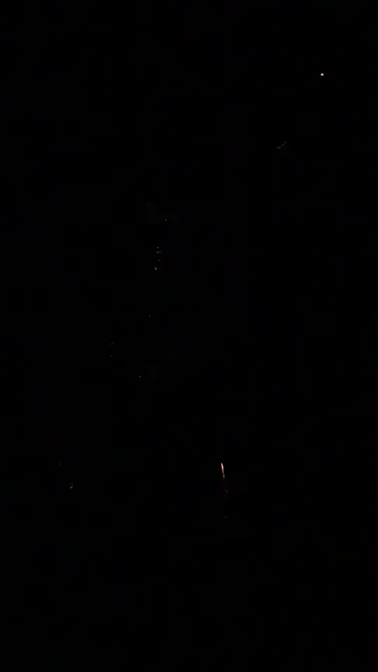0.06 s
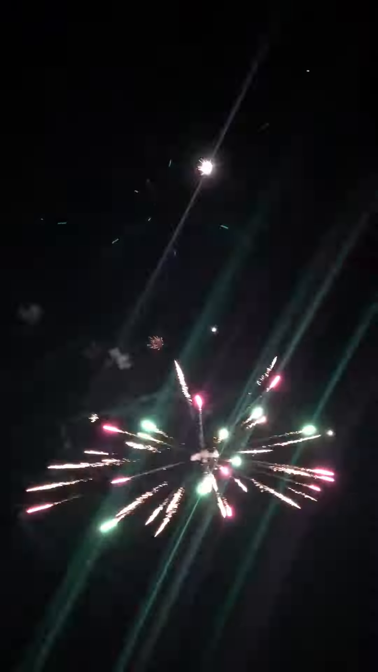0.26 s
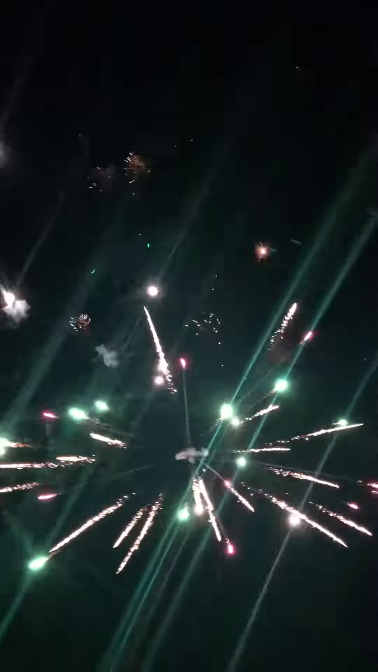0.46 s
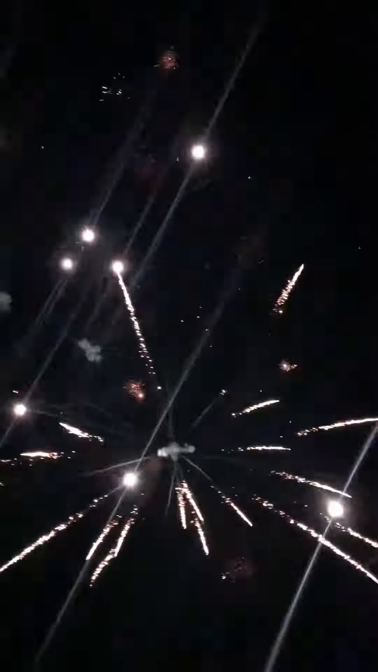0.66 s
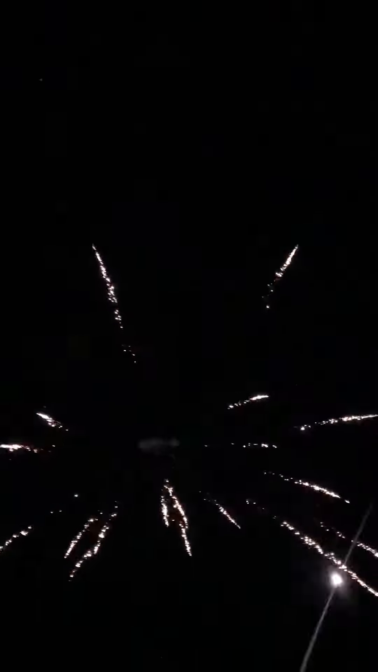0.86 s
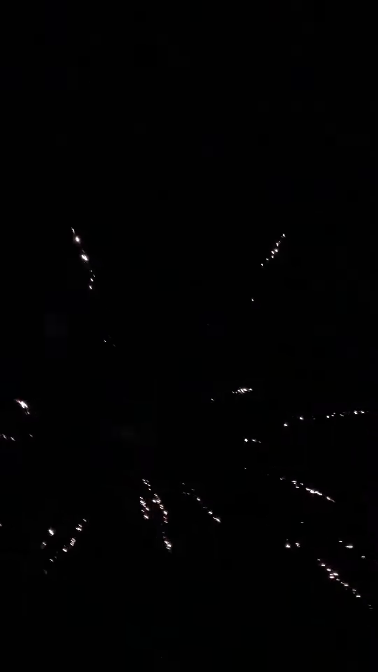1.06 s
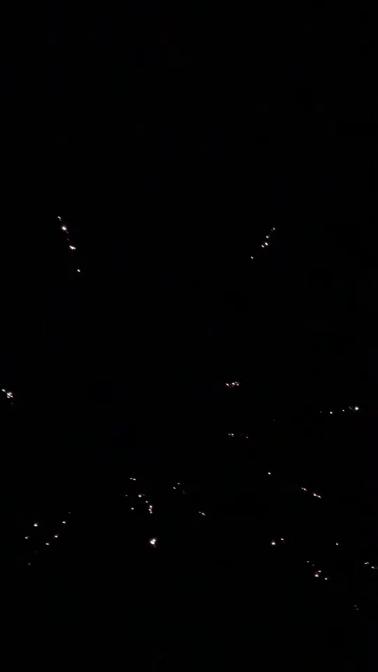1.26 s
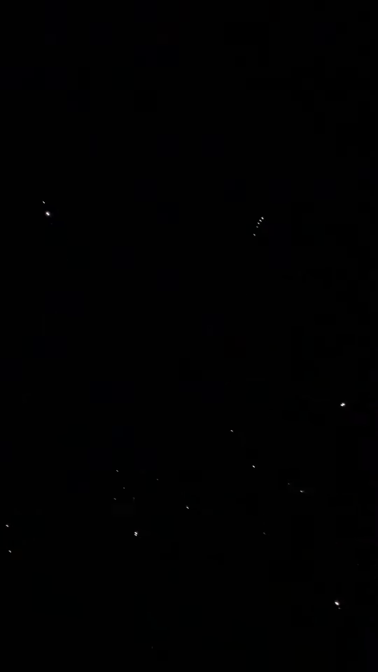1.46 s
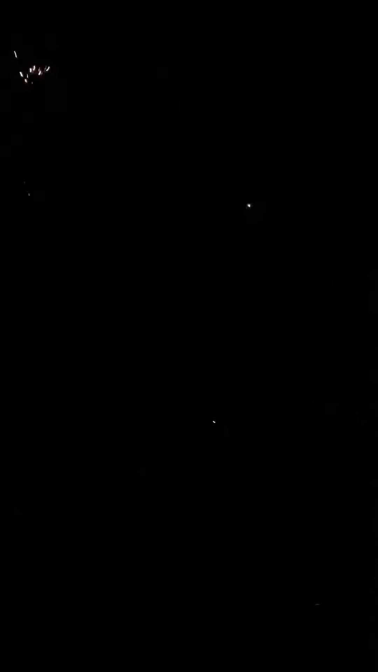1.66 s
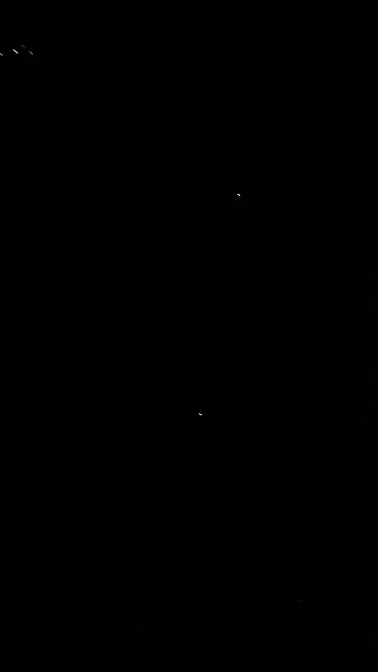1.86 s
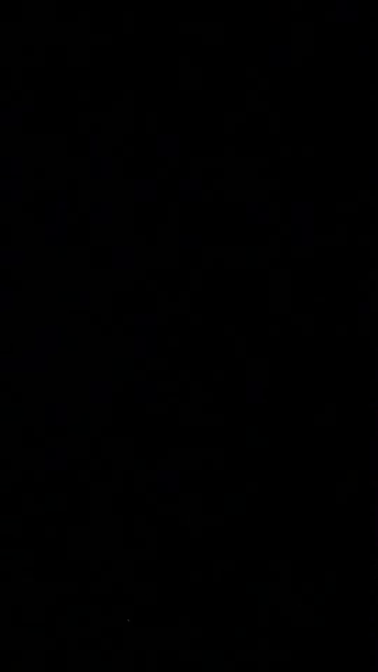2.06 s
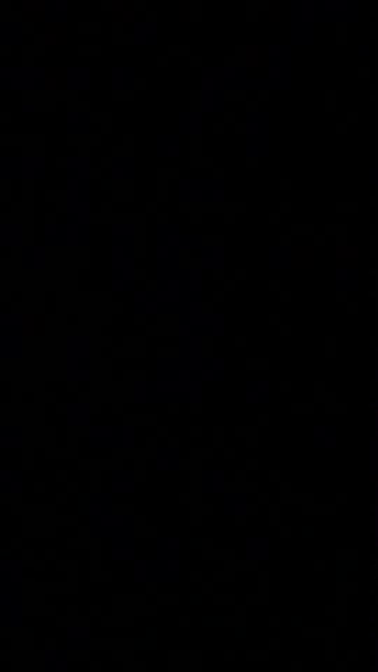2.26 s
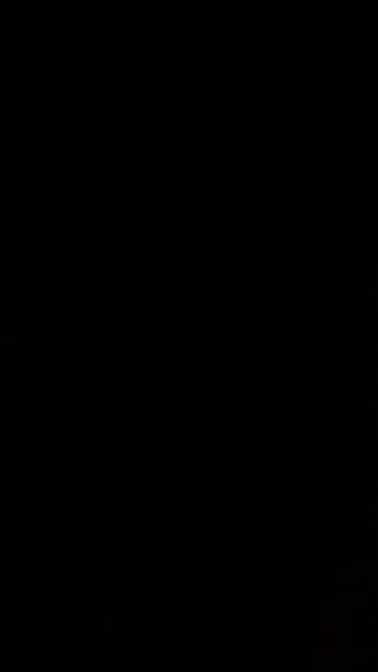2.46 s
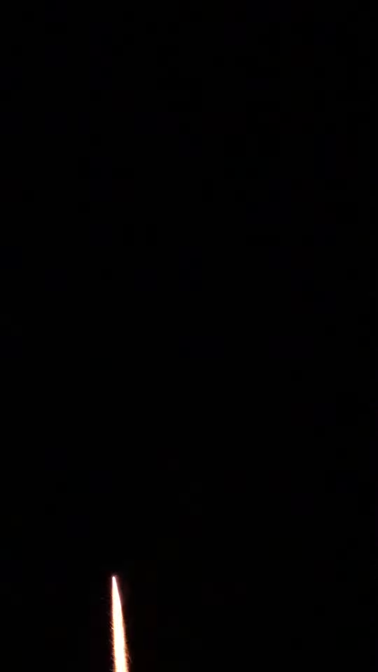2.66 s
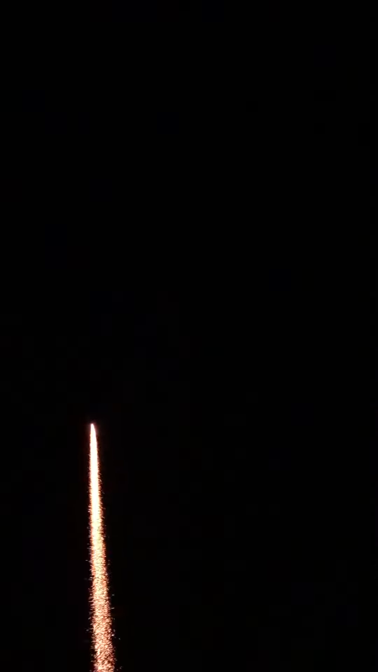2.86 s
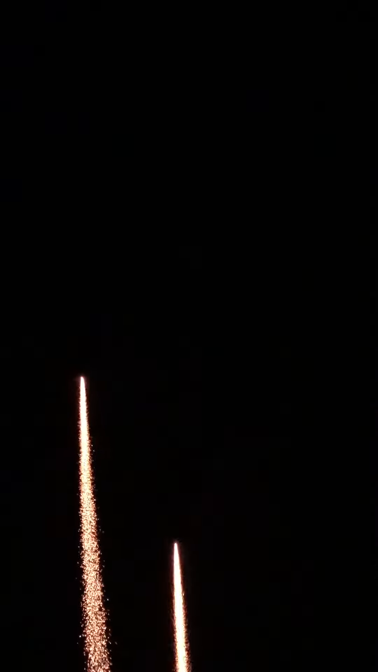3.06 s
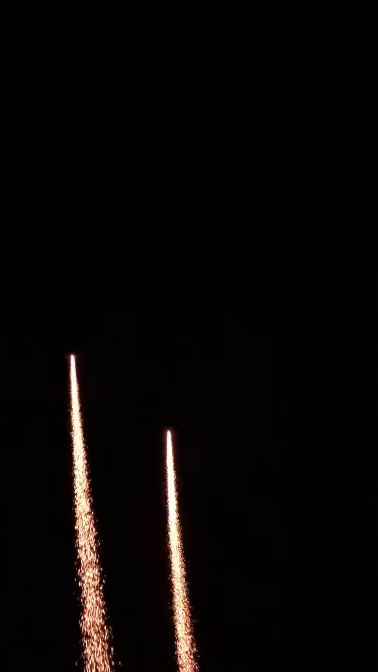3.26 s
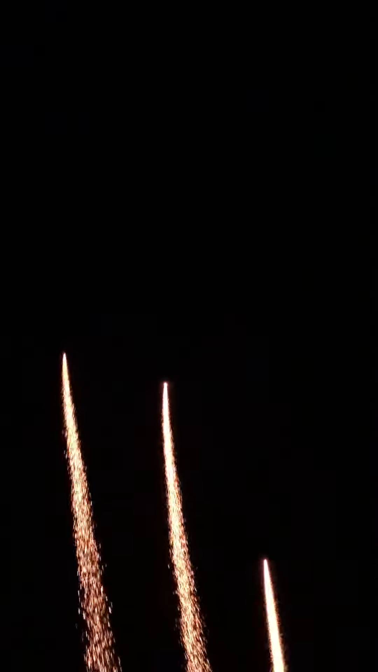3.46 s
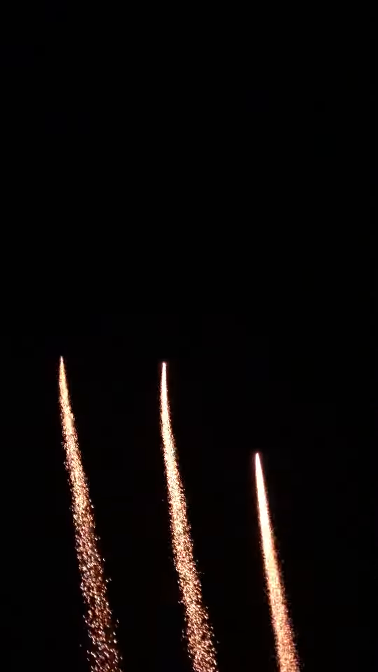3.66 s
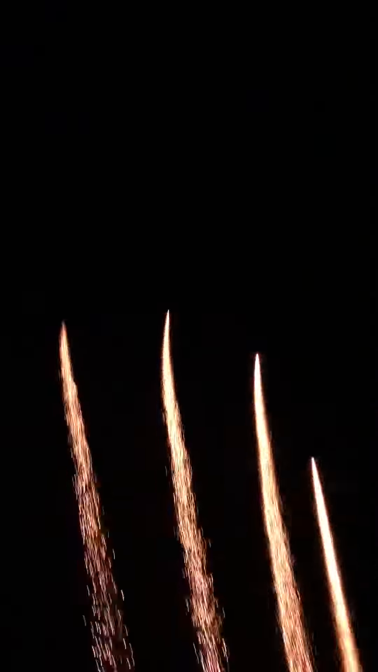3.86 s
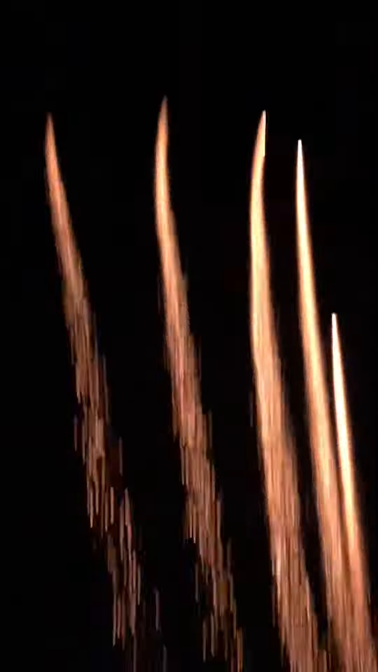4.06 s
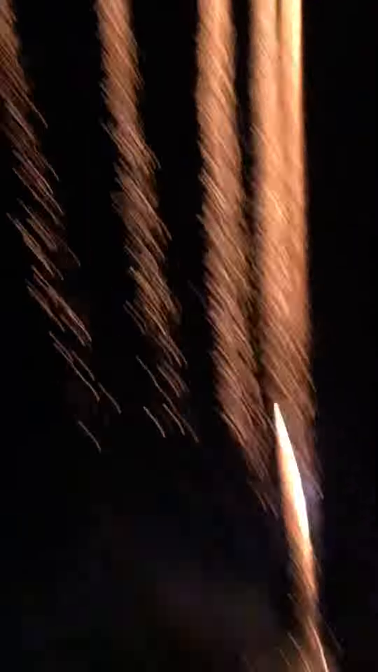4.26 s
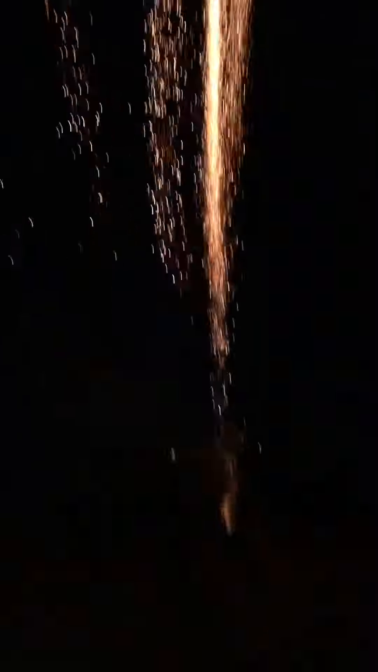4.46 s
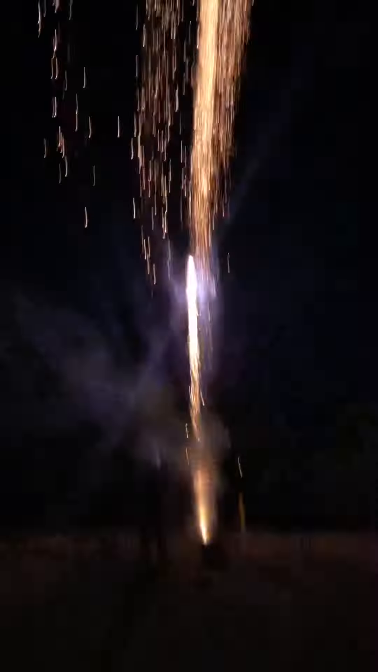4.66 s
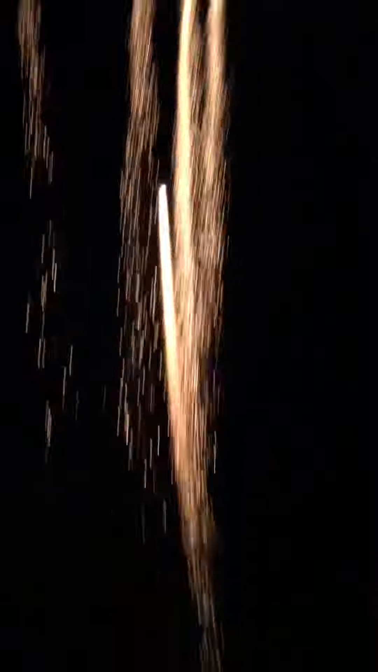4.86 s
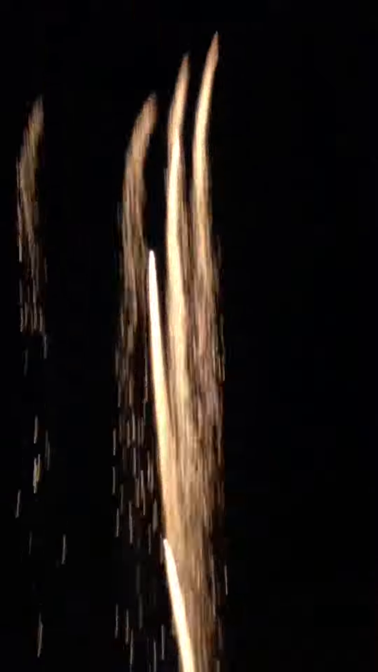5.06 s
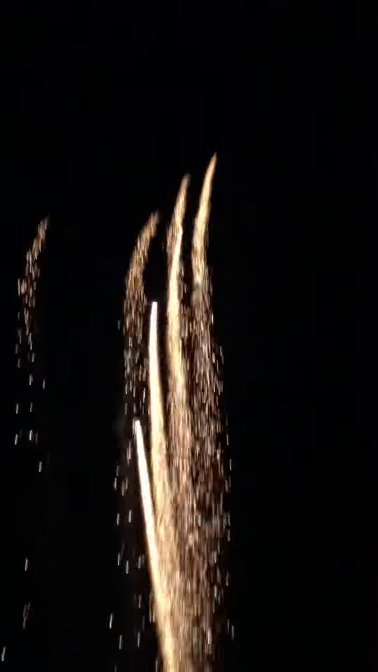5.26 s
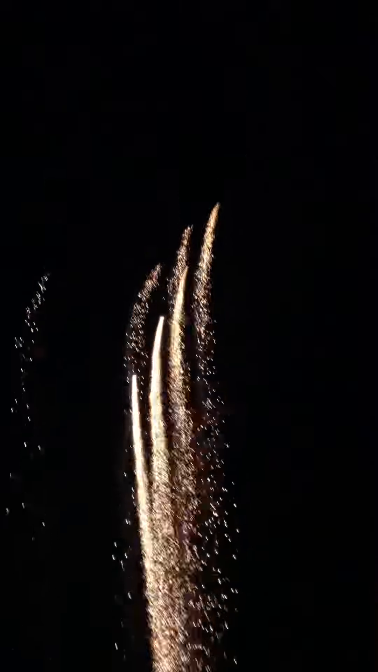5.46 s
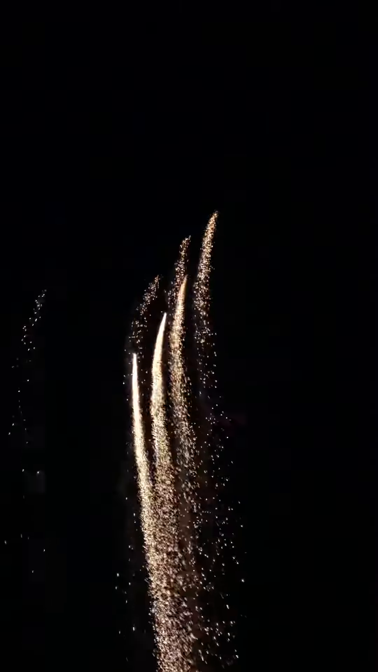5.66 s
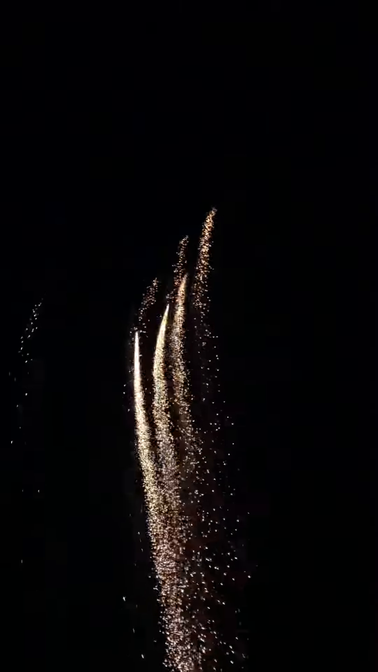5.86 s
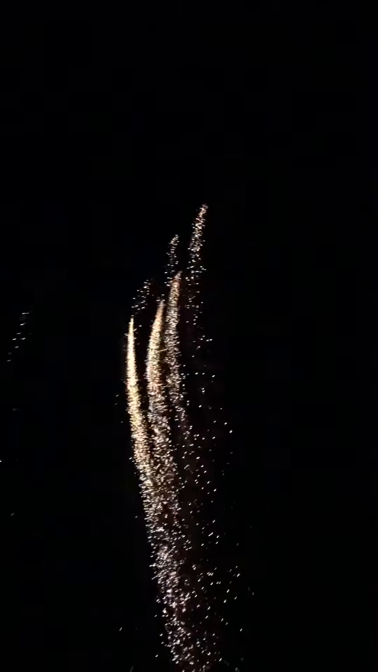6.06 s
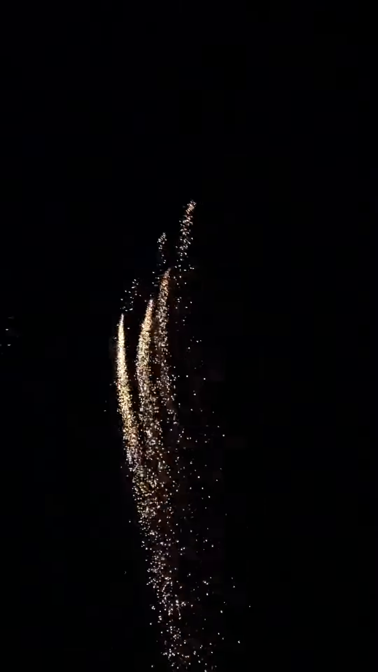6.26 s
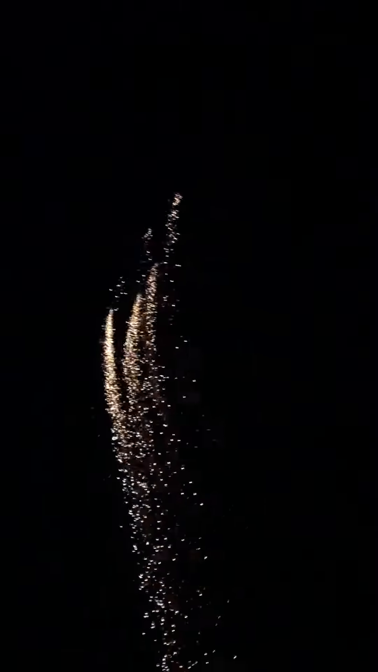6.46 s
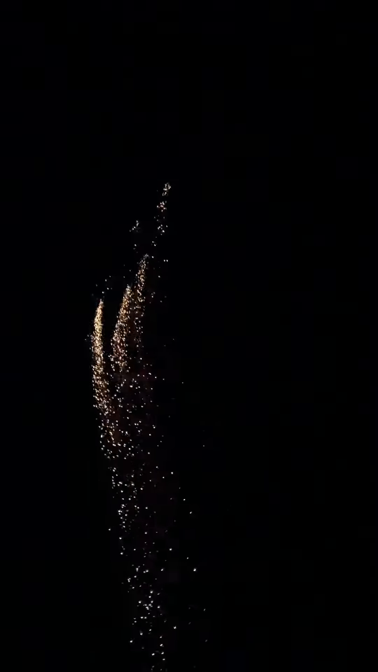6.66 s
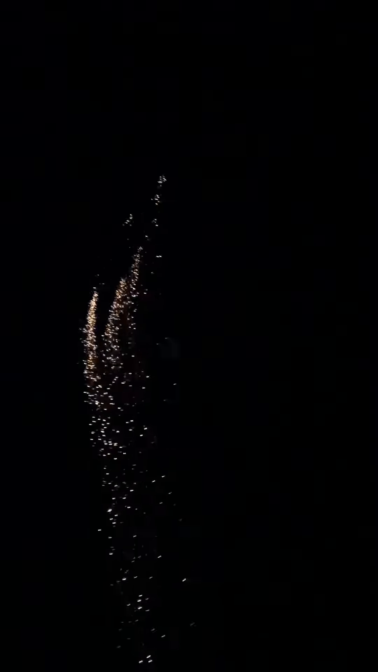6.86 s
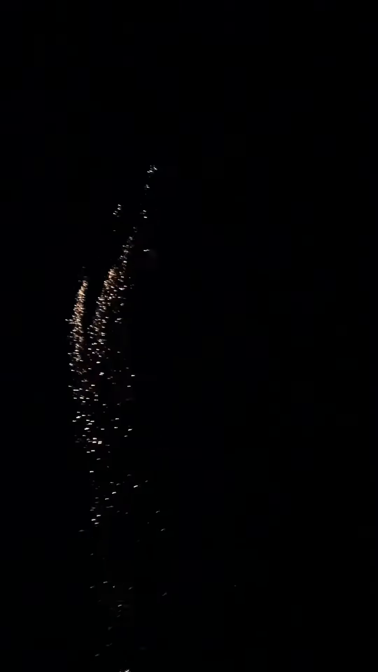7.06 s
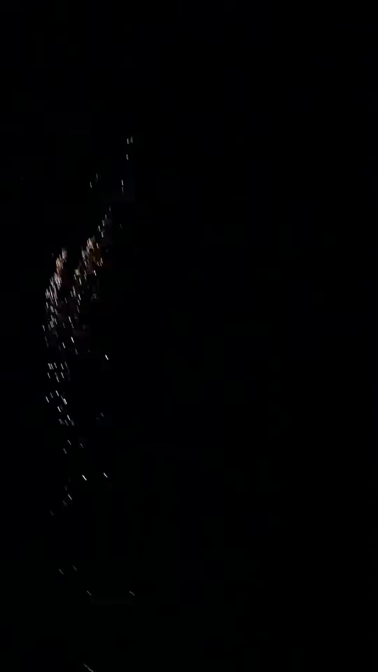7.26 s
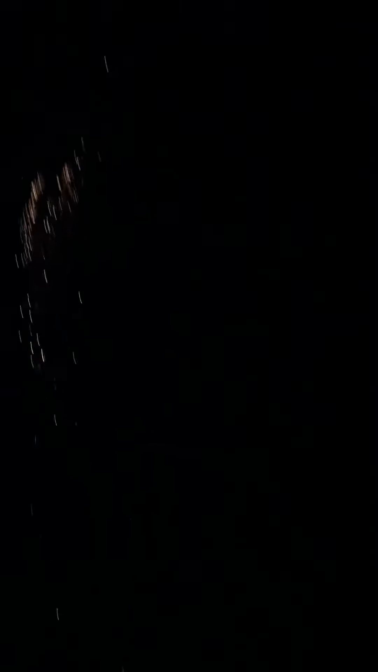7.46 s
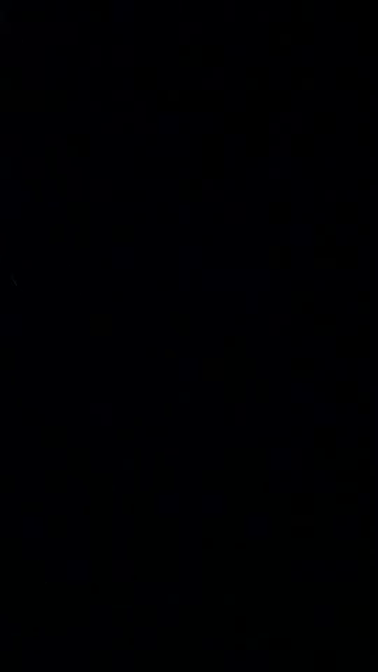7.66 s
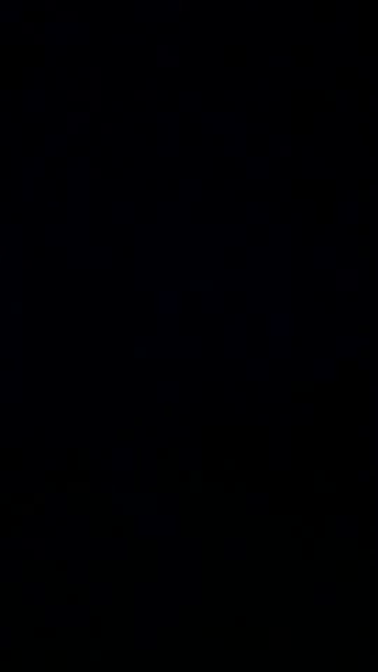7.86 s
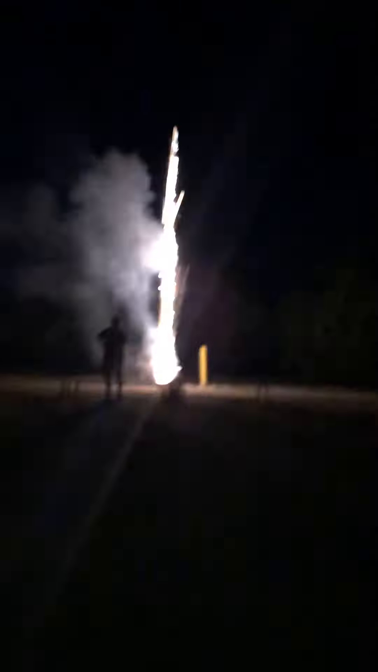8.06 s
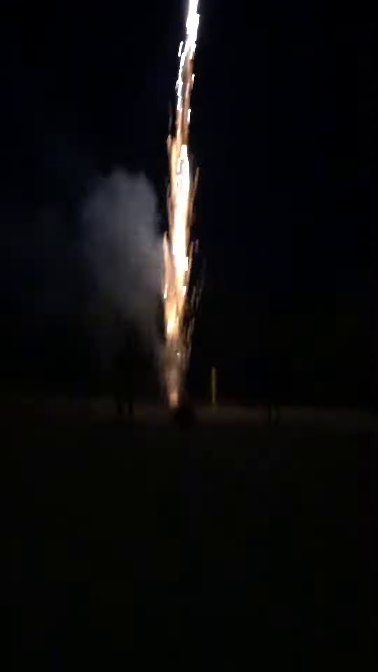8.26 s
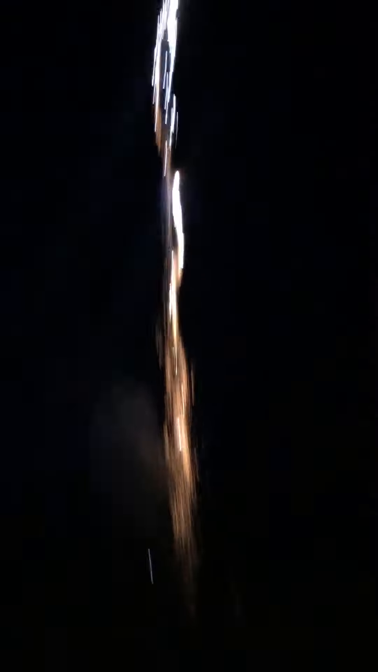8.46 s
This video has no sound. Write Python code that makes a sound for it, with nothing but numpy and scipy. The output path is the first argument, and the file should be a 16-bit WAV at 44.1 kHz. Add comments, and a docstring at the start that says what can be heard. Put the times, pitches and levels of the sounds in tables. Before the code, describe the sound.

Outdoors at night, the echo of an earlier firework is fading when a shell bursts overhead with a loud bang at about 0.2 seconds. Its stars crackle densely from 0.35 to 1 second, with stray pops at 1.2 and 1.7 as the echo rolls away. From 2.4 to 5 seconds a fireworks cake fires eight shots, roughly a third of a second apart. Each is a sharp, hollow thump with a brief spit of gas, echoing off walls and far trees. A lull follows, holding only a few tiny ticks and the very faint background: a low murmur of distant traffic, a thin machine hum and a cricket. At about 8 seconds three shots fire almost together, and a shrill, warbling whistle sputters, swells and begins to recede as it climbs, lasting to the end at around 8.5 seconds.

```python
"""A shell bursts overhead, over the fading roll of an earlier one, and its stars crackle: a fireworks cake
on open ground at night. Eight comets thump from their tubes one by one, then three shots leave almost
together and a warbling whistle climbs away. Each blast is a pressure pulse, reflected by the ground and
walls and scattered by far trees. Between shots a low murmur, a distant hum and a cricket remain."""
import sys
import numpy as np
from scipy import signal
from scipy.fft import rfft, irfft, next_fast_len
from scipy.io import wavfile
from scipy.ndimage import uniform_filter1d, minimum_filter1d, map_coordinates

SR = 44100
rng = np.random.default_rng(int(sys.argv[2]) if len(sys.argv) > 2 else 0)


def store_pcm(level_fs):
    """Save levels as 16-bit WAV."""
    pcm = np.round(np.clip(level_fs, -1, 1) * 32767).astype(np.int16)
    wavfile.write(sys.argv[1], SR, np.atleast_2d(pcm).T)


N = 374850
T = np.arange(N) / SR
PAD = SR  # event tracks start one second early

def amp(db):
    return 10 ** (np.asarray(db) / 20)

def unit_rms(x):
    return x / np.sqrt(np.mean(x ** 2) + 1e-20)

def along(table, hz, column=1):
    """Interpolation of a table column on a log-frequency axis."""
    rows = np.array(table)
    return np.interp(np.log(hz + 1), np.log(rows[:, 0] + 1), rows[:, column])

def filtered(x, response):
    """Linear filtering: the spectrum of x times a frequency response."""
    size = next_fast_len(len(x) + 8192)
    return irfft(rfft(x, size) * response(np.fft.rfftfreq(size, 1 / SR)), size)[:len(x)]

def band(hz, width):
    """Second-order resonance, its bandwidth a share of its pitch."""
    return lambda f: 1j * f * hz * width / (hz * hz - f * f + 1j * f * hz * width)

def wobble(rate_hz):
    """Random modulation: a smooth curve through rate_hz knots a second."""
    return map_coordinates(rng.standard_normal(int(N * rate_hz / SR) + 4), [T * rate_hz])

def add(track, start_s, sound):
    """Superposition of a sound on an event track."""
    part = track[PAD + round(start_s * SR):][:len(sound)]
    part += sound[:len(part)]

def shaped_noise(spectrum):
    """Spectral shaping of white noise, RMS 1."""
    return unit_rms(filtered(rng.standard_normal(N), lambda f: amp(along(spectrum, f))))

def impulse(spectrum):
    """Minimum phase: the most abrupt pulse with this spectrum, peak 1."""
    cepstrum = irfft(np.log(amp(along(spectrum, np.fft.rfftfreq(2048, 1 / SR)))))
    cepstrum[1:1024] *= 2
    cepstrum[1025:] = 0
    pulse = irfft(np.exp(rfft(cepstrum)))[:1024]
    return pulse / np.abs(pulse).max()

def blast(positive_s):
    """Blast wave: a pressure jump followed by suction."""
    u = np.arange(1500) / SR / positive_s
    return (1 - u) * np.exp(-u)

def puff(hz, fall_30db_s):
    """Exponential decay of band-limited noise, peak 1."""
    t = np.arange(SR // 5) / SR
    noise = rng.standard_normal(len(t)) * amp(-30 * t / fall_30db_s)
    sound = filtered(noise, lambda f: band(hz, 1.2)(f) ** 2)
    return sound / np.abs(sound).max()

# Spectrum of far traffic: frequency_hz, relative_db
TRAFFIC_SPECTRUM = [(12, -45.5), (20, -13.5), (75, -2), (108, -8), (139, -3.5), (174, -11), (452, -17),
                    (1280, -31.5), (1740, -27), (2120, -34.5), (15200, -47.5), (16500, -52)]
def traffic():
    """Incoherent sources: far traffic merges into low, gently wavering noise."""
    return shaped_noise(TRAFFIC_SPECTRUM) * amp(-59 + .99 * wobble(3.6))

# Tones of a distant machine: pitch_hz, level_db
HUM_TONES = [(1707, -73), (1830, -76.5)]
def machine_hum():
    """Narrowband tones, drifting in level and phase."""
    return sum(amp(db + 1.3 * wobble(3.8)) * np.sin(2 * np.pi * hz * T + .4 * wobble(21))
               for hz, db in HUM_TONES)

def cricket():
    """Amplitude modulation: a high tone pulses in irregular chirps."""
    chirps = np.clip(wobble(7.8), 0, 1)
    pulses = np.clip(np.sin(2 * np.pi * 28 * T + 2 * wobble(16)), -.3, 1)
    return amp(-80) * chirps * pulses * np.sin(2 * np.pi * 4700 * T + 1.5 * wobble(60))

# Small ticks, dull knocks and a low wind bump: start_s, level_db, pitch_hz, fall_30db_s
SMALL_SOUNDS = [(.164, -37, 6100, 0.0025), (.175, -27, 670, .016), (1.588, -32, 497, 0.0084),
                (1.596, -50, 4900, .003), (2.218, -37.5, 850, 0.008), (2.336, -37, 502, .03),
                (3.2072, -17, 1210, 0.0036), (5.46, -52, 4480, .011), (6.029, -55, 5870, 0.0032),
                (6.07, -50.5, 1390, .014), (6.627, -54, 4470, .004), (6.872, -57.5, 3470, .034),
                (7.236, -49, 5930, .0046), (7.243, -50.5, 3440, 0.092), (7.655, -54, 3480, .02),
                (7.67, -48, 488, .049), (7.79, -47.5, 64.5, 0.1)]
def small_sounds():
    """Damped noise transients: ticks, knocks and a wind bump, plus faint ticks at chance times."""
    out = np.zeros(N + PAD)
    faint = [(when * N / SR, -58 - 6 * size, 4500 * (.5 + pitch), .005)
             for when, size, pitch in rng.random((24, 3))]
    for start_s, db, hz, fall_s in [*SMALL_SOUNDS, *faint]:
        add(out, start_s, amp(db) * puff(hz, fall_s))
    return out

# Decay of the scattered sound: frequency_hz, near_t60_s, far_t60_s, far_level_db
TAIL_DECAY = [(60, 0.14, 3.9, -15), (252, 0.4, 3.45, -19.5), (930, 0.45, 3.81, -15.5),
              (2900, 0.66, 2.13, -13.5), (7540, 0.54, 0.83, -20), (14800, 0.15, 0.44, -23)]
def reverberation(spectrum, onset_s, rise_s, treble_db=0):
    """Diffuse scattering: near things answer first, far trees longest, in uneven lumps."""
    hz, t, noise = signal.stft(rng.standard_normal(3 * SR), SR, nperseg=256)
    near_t60, far_t60, far_db = [along(TAIL_DECAY, hz, column)[:, None] for column in (1, 2, 3)]
    decay = np.hypot(amp(-60 * t / near_t60), amp(far_db - 60 * t / far_t60))
    lumps = uniform_filter1d(rng.standard_normal(noise.shape), size=7, axis=0)
    lumps = uniform_filter1d(lumps, size=9, axis=1)
    tail = signal.istft(noise * decay * amp(2.3 * unit_rms(lumps)), SR, nperseg=256)[1]
    tail = filtered(tail, lambda f: amp(along(spectrum, f)))
    tail /= np.sqrt(np.mean(tail[:SR // 10] ** 2))
    tail = filtered(tail, lambda f: amp(treble_db * f ** 2 / (f ** 2 + 3500 ** 2)))
    t = np.arange(len(tail)) / SR
    early = .37 * np.clip(t / .01, 0, 1)
    late = 1 - np.exp(-np.clip(t - onset_s, 0, None) / rise_s)
    return tail * (early + late)

# Single reflections from walls: delay_s, relative_db, pitch_hz, smear_s
WALL_ECHOES = [(0.0194, -17, 2165, 0.0095), (.048, -19, 3550, 0.013), (.078, -21.5, 900, .004)]
def add_wall_echoes(track, start_s, thump, colour, echo_db):
    """Rough reflection: each uneven wall smears the crack of a launch and returns its thump."""
    t = np.arange(900) / SR
    for delay_s, db, hz, smear_s in WALL_ECHOES:
        rough = rng.standard_normal(len(t)) * np.exp(-2 * (2 * t / smear_s - 1) ** 2)
        smeared = np.convolve(blast(.00028), rough / np.linalg.norm(rough))
        crack = filtered(smeared, lambda f: band(hz, 2.5)(f) * colour(f))
        add(track, start_s + delay_s, amp(db + echo_db + 45) * crack)
        add(track, start_s + delay_s + smear_s / 2, amp(db + 2) * filtered(thump, band(480, 1.3)))

# Turning points of the whistle's fundamental: time_s, pitch_hz
WHISTLE_PITCH = [(8.1, 2502), (8.109, 2664), (8.125, 2342), (8.15, 2277), (8.191, 2632), (8.224, 2319),
                 (8.255, 2655), (8.275, 2432), (8.291, 2511), (8.31, 2355), (8.347, 2624), (8.372, 2425),
                 (8.402, 2470), (8.413, 2404), (8.441, 2497), (8.5, 2413)]
# Partials of the whistle: pitch_ratio, relative_db
WHISTLE_PARTIALS = [(1, -21.5), (1.5, -25), (2, 1.5), (3, -14.5), (4, -24.5), (5, -27), (6, -27.5)]
# Spectrum of its gas jet: frequency_hz, relative_db
JET_SPECTRUM = [(59, -70), (100, -75), (2210, -29.5), (2460, -24), (4290, -16.5), (4880, -0.5),
                (5670, -11.5), (14800, -37), (16500, -87)]
def whistle():
    """Pulsed combustion in a tube: it sputters, nearly dies, swells to full and recedes."""
    full_s, swell_s, catch_s, open_s, fade_db_per_s = 8.139, .013, .0043, .082, 12.5
    turn_s, turn_hz = np.transpose(WHISTLE_PITCH)
    age = T - turn_s[0]
    hz = uniform_filter1d(np.interp(T, turn_s, turn_hz), size=500) * (1 + .0063 * wobble(250))
    phase = 2 * np.pi * np.cumsum(hz) / SR
    burn_db = np.interp(T, [turn_s[0], full_s - swell_s, full_s], [-15, -33, -9])
    burn_db -= fade_db_per_s * np.clip(T - full_s, 0, None)
    burn = amp(burn_db) * np.clip(age / catch_s + 1, 0, 1) ** 2
    flame = np.clip(age / open_s, 0, 1)  # as it opens, the other partials join the second harmonic
    tone = np.zeros(N)
    for ratio, db in WHISTLE_PARTIALS:
        level = amp(db + 3.3 * wobble(90)) * flame ** abs(ratio - 2) ** .5
        jitter = (3.2 * (ratio % 1) + .12 * ratio) * wobble(300)
        tone += level * np.sin(ratio * phase + jitter)
    jet = shaped_noise(JET_SPECTRUM) * amp(-15.5 + 2.9 * wobble(84))
    return burn * (tone + jet)

def climbing(direct):
    """Doppler shift: the whistle's ground echo lags ever more, so it sounds flat and beats; walls echo."""
    age = np.clip(T - WHISTLE_PITCH[0][0], 0, None)
    lag_s = .003 + .011 * (1 - np.exp(-age / .25))
    ground = map_coordinates(direct, [(T - lag_s) * SR])
    out = direct + filtered(ground, lambda f: 1.11 / (1 + (f / 8000) ** 2))
    for delay_s, db, *_ in WALL_ECHOES:
        out += amp(db - 1.5) * np.pad(direct, (round(delay_s * SR), 0))[:N]
    return out

# Spectrum of one crack: frequency_hz, relative_db
CRACK_SPECTRUM = [(20, -37.5), (150, -9), (500, 1), (1500, 3.5), (4000, 1), (8000, -5.5), (16000, -21.5)]
# Spectrum of the echoes of blasts overhead: frequency_hz, relative_db
SKY_ECHO_SPECTRUM = [(24, -68), (40, -44.5), (191, -5), (1090, -5.5), (1200, -8.5), (3370, -13.5),
                     (5050, -14.5), (7950, -21.5), (15300, -30.5), (16500, -45.5)]
# Loud crackling stars: start_s, level_db
LOUD_STARS = [(.3392, -17), (.3650, -7.5), (.3763, -9), (.3916, -6), (.4006, -11), (.4102, -6), (.4448, -4),
              (.4641, -5.5), (.4750, -10), (.4836, -4.5), (.4902, -9.5), (.5044, -8), (.5112, -7.5),
              (.5152, -4.5), (.5270, -3.5), (.5437, -11), (.5600, 0.5), (.5702, -3.5), (.5765, -5.5),
              (.5895, -13), (.5980, -2), (.6010, -6), (.6230, 1.5), (.6405, -0.5), (.6425, -7.5),
              (.6515, -6), (.6585, -1), (.6615, -3), (.6700, -6), (.6752, -6), (.6797, 3), (.6975, -2.5),
              (.7072, -2), (.7136, -3), (.7322, 1.5), (.7512, -2.5), (.7590, -1), (.7818, -3), (.7938, 0.5),
              (.8080, -9.5), (.8150, -5), (.8278, 0.5), (.8380, -5), (.8584, 3), (.8820, -5.5), (.8974, -7),
              (.9012, -5.5), (.9540, 1), (1.2018, 1), (1.6704, 0)]
def stars():
    """Impulse train: stars crack, twice in the dense swarm, and reflect off rough ground."""
    swarm_s, spread_s, mean_gap_s = .67, .085, .0016
    weak_stars = [(swarm_s + 2 * spread_s * (a + b + c - 1.5), -10 - 22.5 * size)
                  for a, b, c, size in rng.random((85, 4))]
    cracks, second_cracks, tints = np.zeros((3, N + PAD))
    for start_s, db in [*LOUD_STARS, *weak_stars]:
        tint, gap, drop = rng.random(3)
        add(cracks, start_s, amp([db]))
        add(tints, start_s, amp([db]) * .84 * (tint - .5))
        if start_s < swarm_s + 3 * spread_s:
            add(second_cracks, start_s + mean_gap_s * (.5 + gap), amp([db - 2 - 16.5 * drop]))
    cracks += filtered(tints, band(1500, 1.8))  # each star has its own colour
    ground = rng.standard_normal(90) * amp(-.12 * np.arange(90))
    paths = np.pad(amp(-17) * ground / np.linalg.norm(ground), (round(.0112 * SR), 0))
    paths[0] = 1  # the direct path
    pops = signal.fftconvolve(cracks + second_cracks, np.convolve(paths, impulse(CRACK_SPECTRUM)))
    roll = signal.fftconvolve(cracks, reverberation(SKY_ECHO_SPECTRUM, onset_s=.052, rise_s=.16))
    return pops[:N + PAD] + amp(-38) * roll[:N + PAD]

# Shell bursts in the sky: start_s, crack_db, boom_db, rumble_db, walls_db, roll_db
SHELL_BURSTS = [(-.45, -10, 4, -8, -18, -22), (0.1888, -1, 15.5, -6.5, -23, -26.5)]
def shells():
    """Multipath propagation: a blast arrives direct, off the ground, off near walls, then as a roll."""
    out, t = np.zeros(N + PAD), np.arange(SR // 20) / SR
    crack = np.pad(impulse(CRACK_SPECTRUM), (0, 476))
    boom = filtered(blast(.0002), band(640, 1))
    rumble = filtered(blast(.0075), band(76, 1.1))
    wall_colour = lambda f: amp(along(SKY_ECHO_SPECTRUM, f)) * (.51 + band(800, 1.2)(f))
    for start_s, crack_db, boom_db, rumble_db, walls_db, roll_db in SHELL_BURSTS:
        shot = amp(boom_db) * boom + amp(crack_db) * crack
        add(out, start_s, shot + amp(rumble_db) * rumble)
        add(out, start_s + .0105, amp(-16) * shot)  # ground reflection
        walls = unit_rms(filtered(rng.standard_normal(len(t)), wall_colour))
        add(out, start_s + .0101, amp(walls_db) * walls * np.exp(-((t - .021) / .0098) ** 4))
        add(out, start_s, amp(roll_db) * reverberation(SKY_ECHO_SPECTRUM, onset_s=.044, rise_s=.03))
    return out

# Spectrum of gas spitting from a tube: frequency_hz, relative_db
GAS_SPECTRUM = [(300, 8), (1000, 3.5), (2500, -6.5), (5000, -8), (9000, -12), (16000, -28)]
def gas_spit(envelope, colour):
    """Flow noise: a ragged burst of escaping gas, peak 1."""
    noise = rng.standard_normal(len(envelope)) * envelope
    gas = filtered(np.convolve(noise, impulse(GAS_SPECTRUM))[:len(noise)], colour)
    return gas / np.abs(gas).max()

# Spectrum of the diffuse echo of a launch: frequency_hz, relative_db
LAUNCH_ECHO_SPECTRUM = [(24, -48.5), (40, -31.5), (172, -2), (239, 0.5), (536, -6.5), (1030, -9),
                        (1710, -12.5), (2760, -18), (5050, -18.5), (8790, -23.5), (15300, -29),
                        (16500, -37.5)]
# Shots from the tubes: start_s, spit_db, thump_db, echo_db, spit_pitch_hz, treble_db, fuse_db
LIFT_CHARGES = [(2.4108, -8, -1, -36, 3750, 9, -47.5), (2.801, -3.5, 0.5, -31, 4730, 2.5, -52.5),
                (3.213, 2, 0.5, -29, 2160, 3, -43), (3.581, -0.5, 2, -29.5, 2950, 3.5, -53),
                (3.884, -2, 0, -28.5, 2983, 6.5, -70), (4.193, 1.5, 2, -31, 4000, 8.5, -63.5),
                (4.5926, -4, 3, -31.5, 6170, 10, -41), (4.953, -3.5, -2.5, -32.5, 3890, 6, -36),
                (8.03, -5, 2.5, -28.5, 7440, 5, -41), (8.0704, -4.5, 1, -47.5, 7200, 22, -62),
                (8.1163, -5, 0.5, -47, 7200, 17.5, -62)]
def launches():
    """Impulse excitation: after a fuse tick and a fizz, the lift charge spits gas and thumps its tube."""
    out, t = np.zeros(N + PAD), np.arange(1500) / SR
    hollow_ring = lambda f: 1 + amp(3.1) * band(270, .091)(f)
    rebound = -filtered(blast(.00045), lambda f: band(240, 1.2)(f) ** 2)
    for start_s, spit_db, thump_db, echo_db, hz, treble_db, fuse_db in LIFT_CHARGES:
        shelf_db = 2 * treble_db - 8
        colour = lambda f: (.3 + band(hz, 1.1)(f)) * amp(shelf_db * f ** 2 / (f ** 2 + 9000 ** 2))
        spit = amp(spit_db) * gas_spit(np.exp(-((t - .0022) / .0014) ** 2), colour)
        fizz = amp(spit_db - 14.5) * gas_spit(amp(-60 * t / .0034)[::-1], colour)
        ring_hz = 490 * (1 + .18 * rng.standard_normal())  # every tube rings a little differently
        ring = filtered(blast(.0005), band(ring_hz, .5))
        thump = amp(thump_db) * (blast(.0014) + amp(-7.5) * ring)
        add(out, start_s - .021, amp(fuse_db) * puff(6800, fall_30db_s=.005))
        add(out, start_s - len(fizz) / SR, fizz)
        for delay_s, spit_share, thump_share in [(0, 1, 1), (.003, .62, .15)]:  # direct, off the ground
            add(out, start_s + delay_s - .0013, spit_share * spit)
            add(out, start_s + delay_s + .0016, thump_share * thump)
        add(out, start_s + .0084, amp(thump_db + 2) * rebound)
        add_wall_echoes(out, start_s, thump, colour, echo_db)
        tail = reverberation(LAUNCH_ECHO_SPECTRUM, onset_s=.027, rise_s=.0072, treble_db=treble_db)
        add(out, start_s, amp(echo_db) * filtered(tail, hollow_ring))
    return out

def scene():
    """Superposition of the fireworks and the night background in one channel."""
    events = launches() + shells() + stars() + small_sounds()
    return (events[PAD:] + climbing(whistle()) + traffic() + machine_hum() + cricket())[None]

# Group delay of the recorder's filters: frequency_hz, delay_s
GROUP_DELAY = [(35, 0.017), (70, 0.02), (130, 0.012), (200, 0.0073), (330, 0.0029), (500, 0.003),
               (1000, .0009), (4000, 0.00014)]
def record(dry):
    """Dispersion: filters delay the bass, so blasts sweep down; a limiter holds peaks; the top is cut."""
    low_cut_hz, top_cut_hz, ceiling = 33, 16200, .86
    dispersion = lambda f: np.exp(-2j * np.pi * np.cumsum(along(GROUP_DELAY, f)) * f[1])
    swept = filtered(dry[0], lambda f: dispersion(f) * f ** 4 / (f ** 4 + low_cut_hz ** 4))
    needed_gain = np.minimum(1, ceiling / (np.abs(swept) + 1e-9))
    limited = swept * uniform_filter1d(minimum_filter1d(needed_gain, size=41), size=21)
    return filtered(limited, lambda f: 1 / (1 + (f / top_cut_hz) ** 80))[None]

dry = scene()
out = record(dry)
store_pcm(out)
```